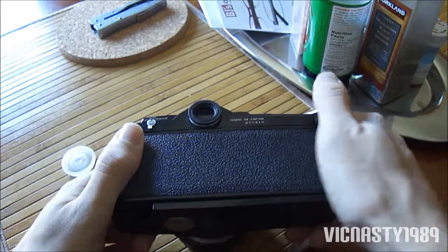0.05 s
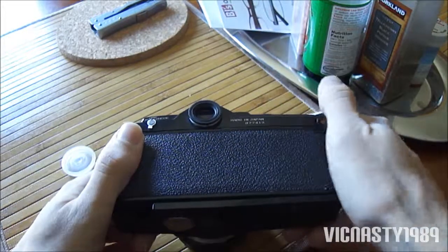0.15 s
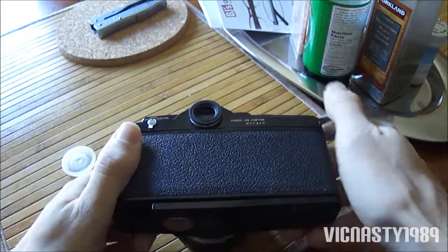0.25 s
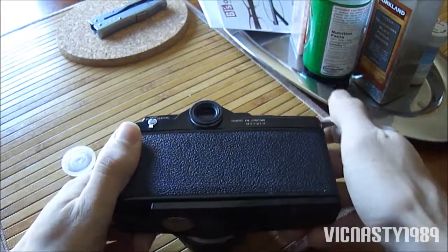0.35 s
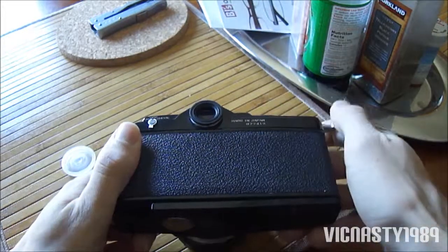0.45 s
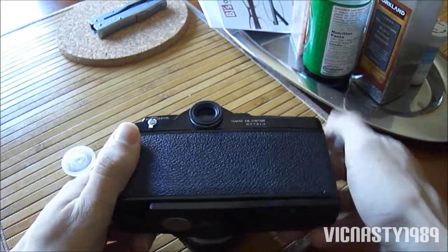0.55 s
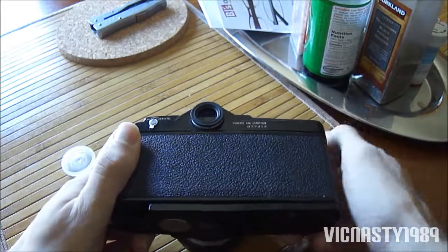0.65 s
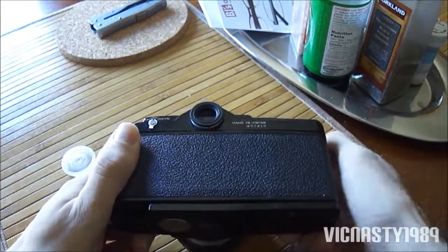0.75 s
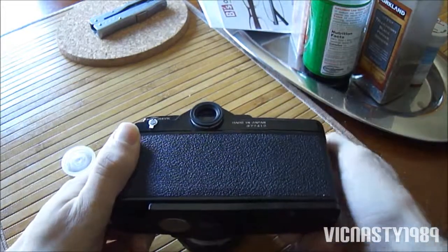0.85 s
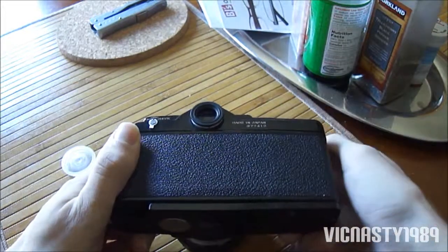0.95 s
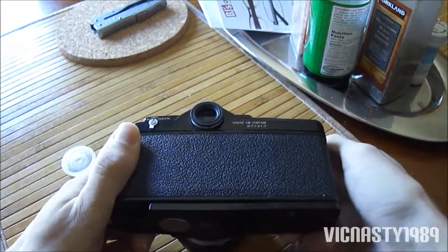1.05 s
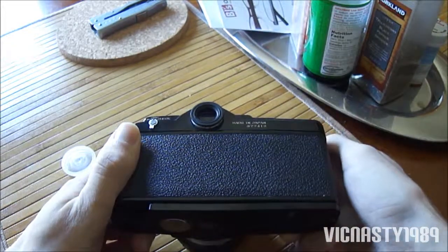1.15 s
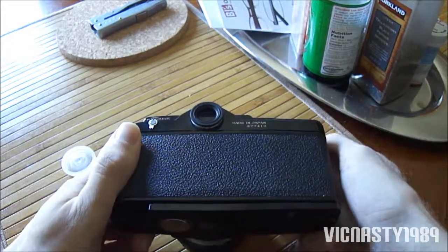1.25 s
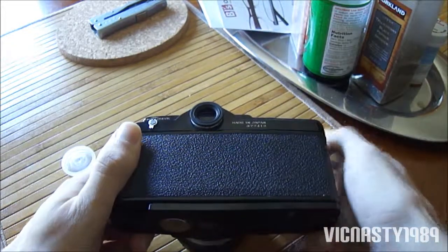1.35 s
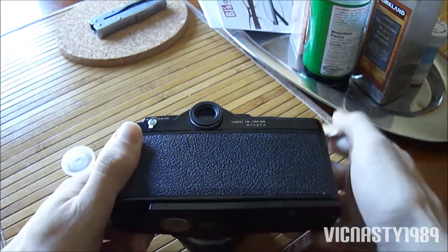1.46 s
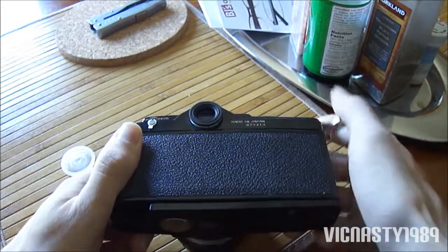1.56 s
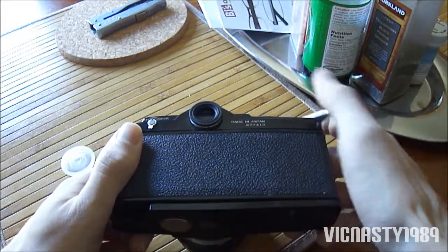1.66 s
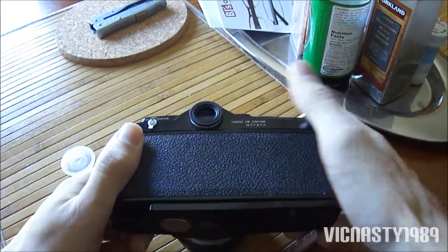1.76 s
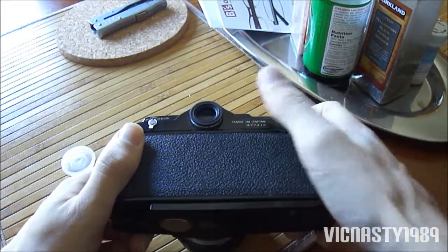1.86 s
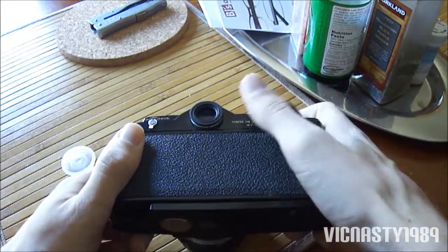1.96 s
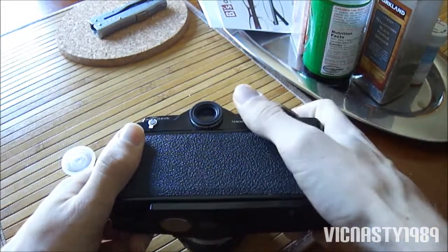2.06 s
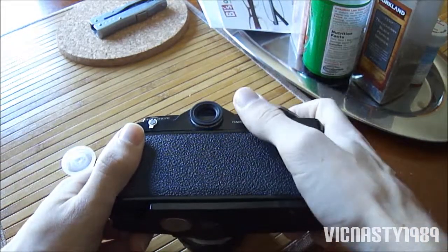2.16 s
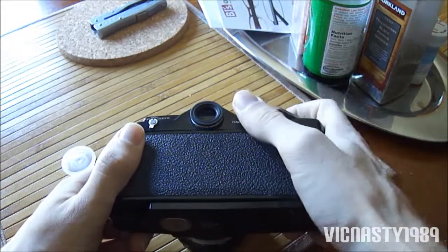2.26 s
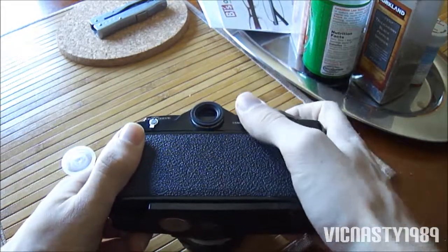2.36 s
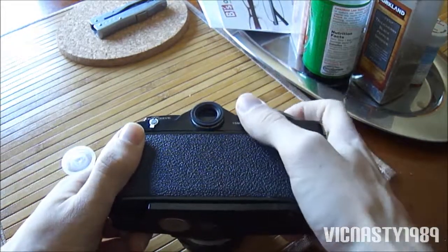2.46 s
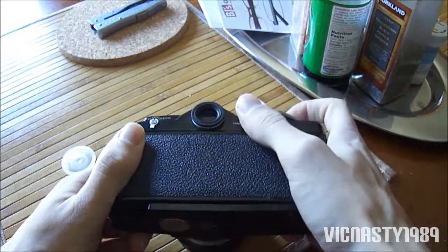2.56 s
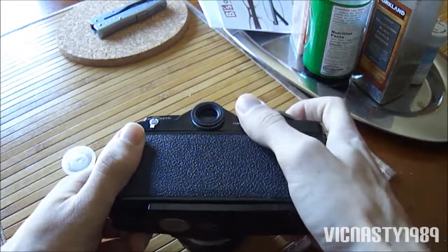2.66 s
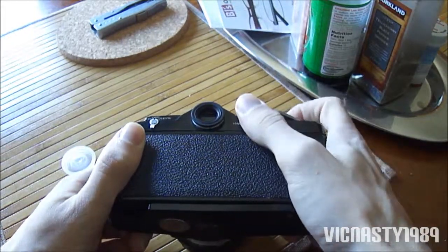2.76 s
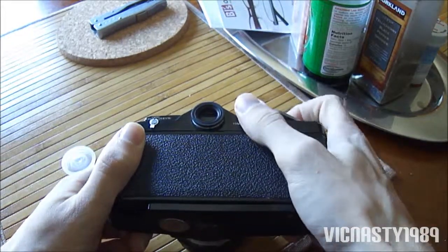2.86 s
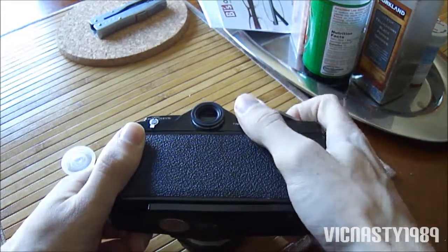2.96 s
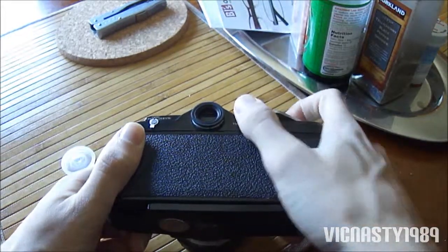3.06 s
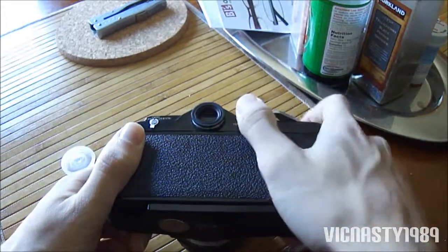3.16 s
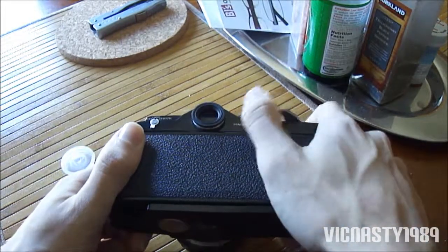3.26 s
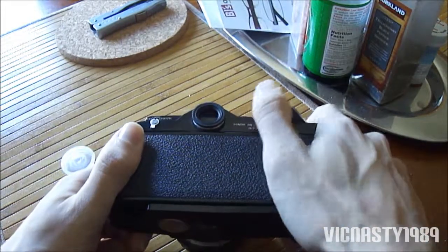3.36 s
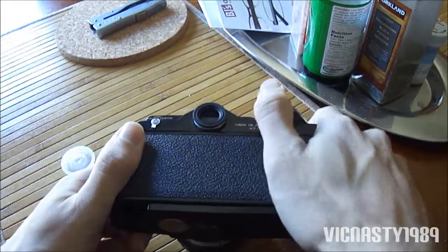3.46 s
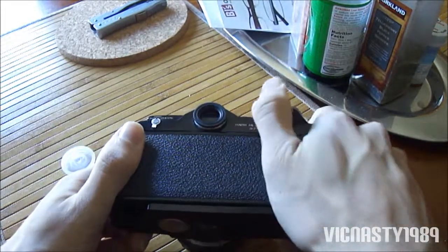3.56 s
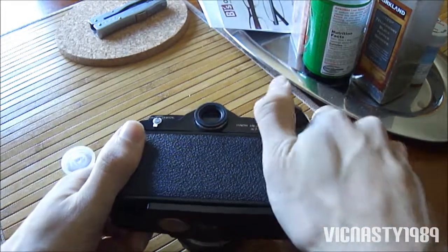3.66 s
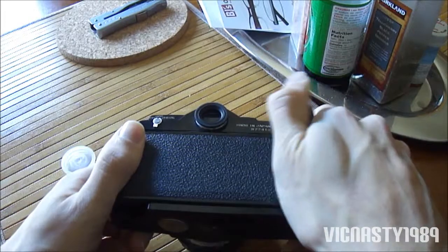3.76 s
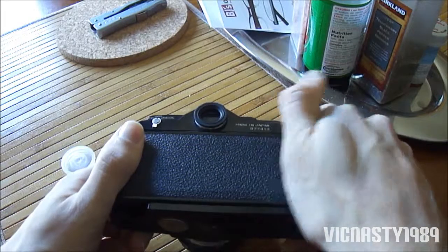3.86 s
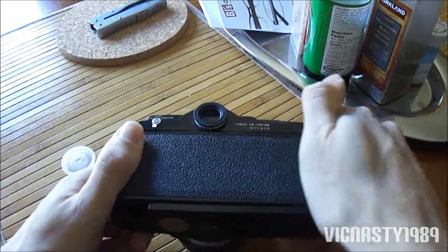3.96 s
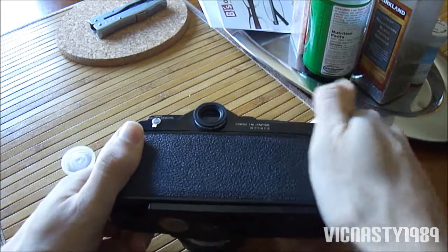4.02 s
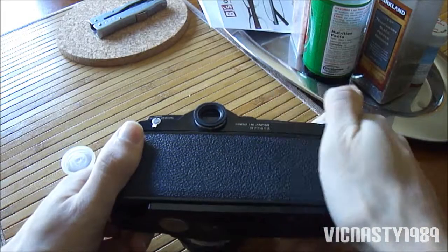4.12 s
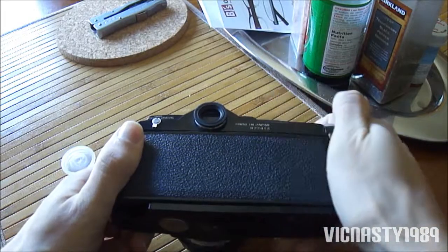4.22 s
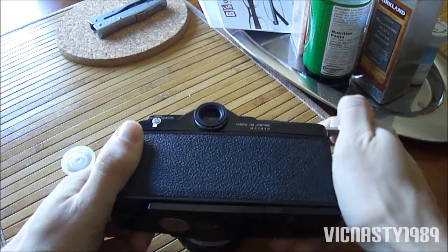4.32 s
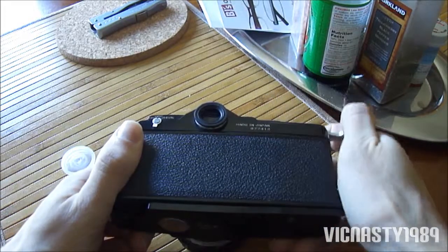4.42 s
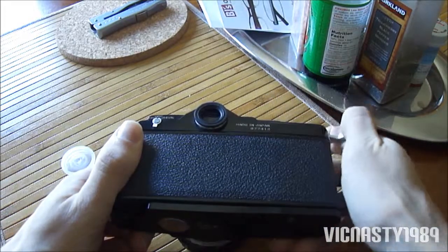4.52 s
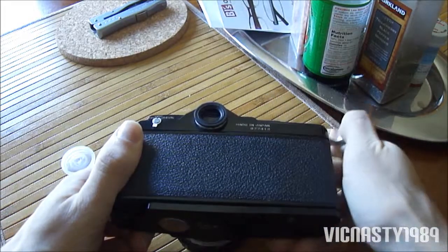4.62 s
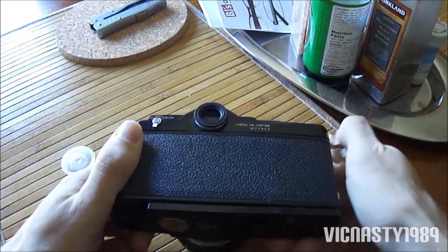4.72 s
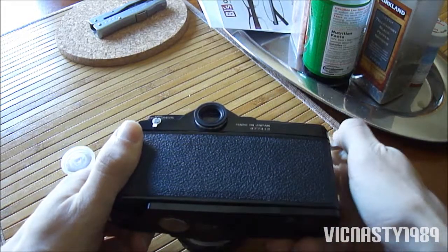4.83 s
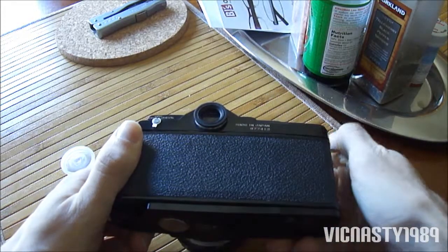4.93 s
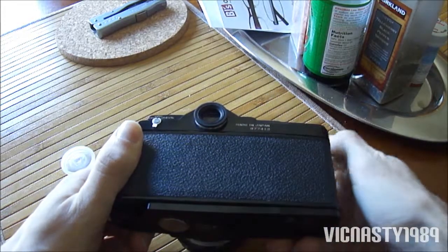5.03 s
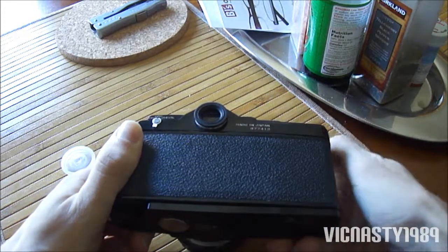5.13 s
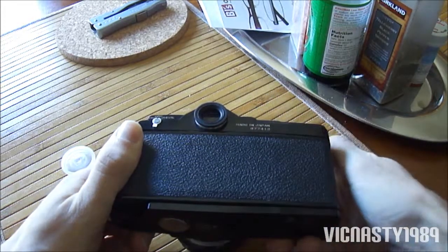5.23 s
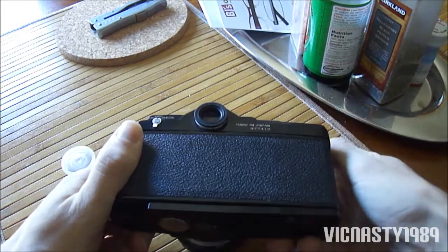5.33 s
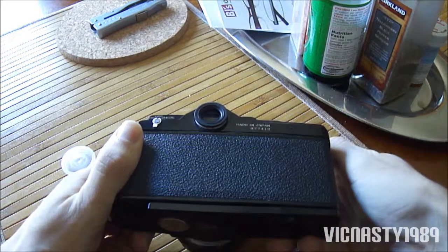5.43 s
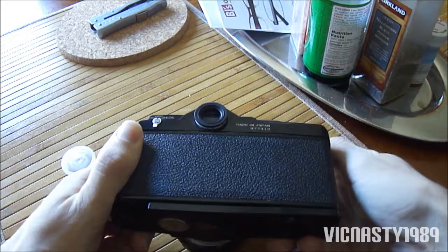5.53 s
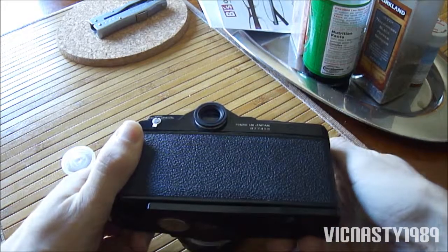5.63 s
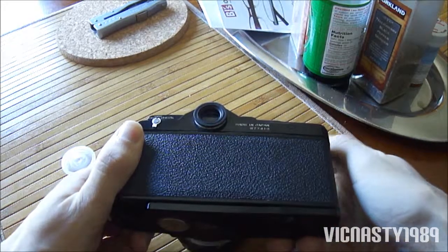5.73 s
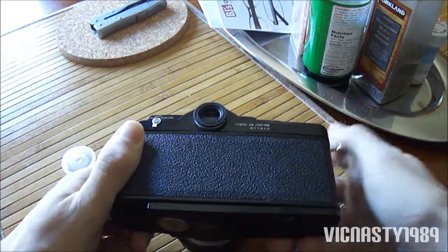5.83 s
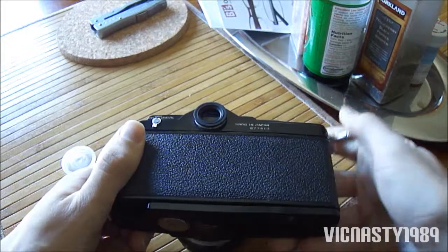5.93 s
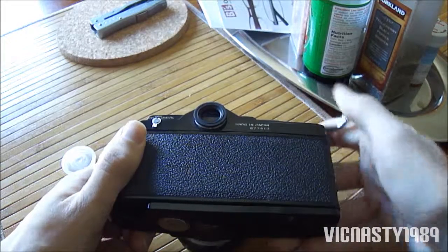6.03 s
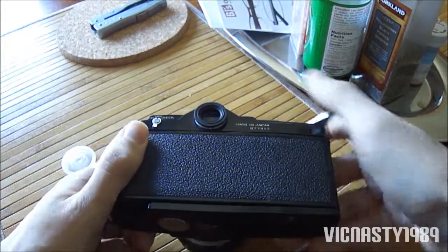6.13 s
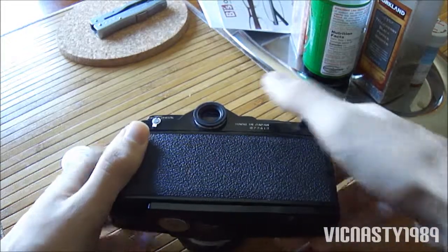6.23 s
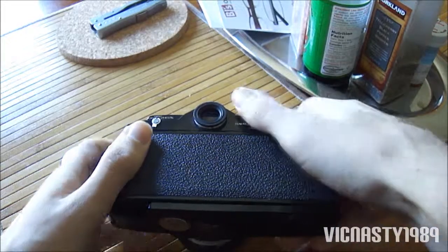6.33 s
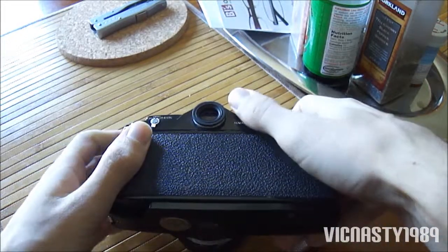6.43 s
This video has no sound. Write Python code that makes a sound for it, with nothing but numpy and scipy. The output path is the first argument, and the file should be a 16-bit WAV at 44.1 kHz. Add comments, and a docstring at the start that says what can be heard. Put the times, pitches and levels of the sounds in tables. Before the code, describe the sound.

Close, crisp metal clicks as a camera lever winds and ratchets back, a loud shutter clack with a short buzz, then slower winding and another ratchet return.

```python
"""In a quiet room with a motor hum, a mechanical film camera is worked by hand over a table, close by.
The lever is wound with pawl and gear clicks and eased back over its return ratchet. Then the shutter clacks
and its slow-speed escapement whirrs, and the lever is wound and eased back once more.
Clicks are bursts of noise that ring metal parts; sliding and rubbing are grainy noise; hum, squeaks and
springs are sine tones. Loud clicks make the recorder turn its level down for a moment."""
import sys
import numpy as np
from scipy import signal
from scipy.fft import rfft, irfft
from scipy.io import wavfile
from scipy.ndimage import uniform_filter1d, minimum_filter1d

SR = 44100
rng = np.random.default_rng(int(sys.argv[2]) if len(sys.argv) > 2 else 0)


def wav_out(sig):
    """Save sig, one row per channel (or a flat mono array), as 16-bit PCM at SR to the path in sys.argv[1]."""
    wavfile.write(sys.argv[1], SR, np.round(np.clip(np.atleast_2d(sig).T, -1, 1) * 32767).astype(np.int16))


N = 285978  # length in samples

# Room air: [f/Hz, relative level/dB per Hz]
AIR_COLOUR = [(25, -36), (60, -29), (110, -15), (200, -2), (350, -4), (500, -7.5), (800, -7.5),
              (1500, -12.5), (2500, -15.5), (5000, -21.5), (11000, -27.5)]
# Motor hum tones, before the hum trim: [f/Hz, level/dB]
HUM_TONES = [(102.3, -77.5), (150.7, -100), (199.2, -64), (247.6, -64), (296.1, -77.5), (371.4, -61.5)]
# How long reflections take to fall by 60 dB: [f/Hz, t60/s]
ROOM_DECAY = [(300, 0.28), (1500, 0.098), (5000, 0.8), (11000, 0.12)]
# Fingers shifting their grip on the leatherette: [start t/s, stop t/s, level/dB, sag/dB per s]
GRIPS = [(0, .15, -39.5, 124), (.42, .86, -47, 3), (1.1, 2.15, -51.5, -0.5), (2.5, 5.2, -52, 1),
         (5.92, 6.48, -56, -6)]
# Spectrum of rubbing fingers: [f/Hz, relative level/dB per Hz]
RUBBING_COLOUR = [(600, -4), (1300, 4), (2500, 2.5), (4500, -2.5), (7000, -5.5), (11000, -12.5)]
# Lever strokes, in which shafts and film slide: [start t/s, stop t/s, level/dB, sag/dB per s]
STROKES = [(.32, .82, -49, -4.5), (1.57, 2.08, -42, 37.5), (3.8, 5.2, -49, .5), (6.02, 6.4, -47.5, 6)]
# Spectrum of sliding shafts and film: [f/Hz, relative level/dB per Hz]
SLIDING_COLOUR = [(1000, -44), (3000, -18), (5500, -7), (9500, 0), (11000, -1)]
# Two faint squeaks of the film spool, each a path of points: [t/s, f/Hz, level/dB]
SQUEAK_PATHS = [
    [(4.6, 10500, -58), (4.625, 9600, -47), (4.65, 9200, -57)],
    [(4.87, 9550, -60), (4.9, 9800, -45), (4.925, 10200, -56), (4.935, 9700, -38), (4.955, 9800, -55)],
]
# Soft fingertip taps on the back door: [t/s, level/dB]
FINGER_TAPS = [(0.2562, -35.5), (5.8245, -39)]
# Light ticks and rebounds of loose parts: [t/s, level/dB]
LOOSE_TICKS = [(0.1961, -34), (0.3035, -34), (0.3104, -32.5), (0.8058, -32.5), (1.3685, -42), (1.4347, -42),
               (1.5904, -31.5), (1.6982, -29), (2.2078, -38), (2.2369, -35.5), (2.7841, -34.5),
               (3.1337, -35), (5.7823, -45.5), (5.9808, -37), (6.128, -25.5)]
# Dull knocks of the lever and fingers on the body: [t/s, level/dB, brightness/dB per octave]
KNOCKS = [(0.4951, -35, 13), (0.5767, -32, 0.0), (0.6517, -28.5, 2.0), (0.8362, -25, 2.5),
          (1.2415, -33, 1.5), (2.0808, -35.5, -2), (2.5795, -38.5, 0.5), (2.7429, -28.5, 4.0),
          (3.3257, -34.5, 3.5), (3.3521, -36.0, 0), (3.8358, -31, -12), (5.1873, -29, 1),
          (5.9161, -39.0, 3.5), (6.3895, -32, 1.5)]
# The lever strikes the end of its stroke: [t/s, level/dB, brightness/dB per octave]
STOP_BLOW = [(.6155, -16, -1)]
# The body's hollow ring at the end of the stroke: [f/Hz, level/dB, t60/s]
END_STOP_TONES = [(790, -28, 0.079), (2050, -32, 0.067), (2420, -42, .07)]
# Gear teeth snatching under load, in short runs: [first tooth t/s, last tooth t/s, number of teeth,
# level of all but the last/dB, level of the last/dB, brightness of the last/dB per octave]
GEAR_RUNS = [(3.798, 3.817, 3, -29, -20.5, -0.5), (3.913, 3.9322, 4, -33, -16, 0),
             (4.056, 4.07, 3, -27.5, -19, 0), (4.222, 4.2467, 2, -32, -21, 1.5),
             (4.3897, 4.433, 4, -33.5, -24, 0), (4.6775, 4.7176, 3, -32, -30, -4),
             (5.0008, 5.023, 3, -28, -23, 0.5)]
# The lever's return ratchet: [t/s, level/dB, brightness/dB per octave]
RETURN_CLICKS = [(1.5675, -20, -0.5), (1.6322, -20.0, -0.5), (1.6897, -17.5, -2.0), (1.7593, -21, 0.5),
                 (1.8531, -19, -2.0), (1.9537, -20.5, -2.5), (5.999, -18.5, 1.0), (6.0621, -20, 0),
                 (6.1173, -18.5, 1.0), (6.1885, -17.5, -1), (6.2471, -18.5, -1), (6.3214, -18, -0.5)]
# The winding pawl and the lever's latch dropping: [t/s, level/dB, brightness/dB per octave]
PAWL_CLICKS = [(0.3132, -19.5, 7), (0.3213, -29, -2.5), (0.3343, -17.5, 3.5), (0.3759, -20.5, 5.5),
               (0.4369, -21, 6.0), (0.4552, -28.5, -3.5), (0.4688, -19, -4), (0.4752, -29, 4),
               (0.5184, -20, 0.5), (0.5448, -25, 6), (0.6087, -21, 2), (0.6334, -16, -4.5),
               (0.6844, -29, -3.5), (0.7002, -21.0, -1.5), (0.747, -27.5, -1), (0.784, -27, -4.5),
               (0.7939, -27.5, -4.5), (0.889, -29.0, 5), (1.4877, -29.5, -1), (2.0048, -25, -5),
               (2.0591, -26.5, -5), (2.0626, -20.5, -5), (3.7736, -23, 3.5), (3.8044, -18, 3.5),
               (3.8295, -21.5, 8), (3.9039, -22.5, 2), (3.9493, -19.0, 1.5), (3.9746, -27.5, -1.0),
               (4.0381, -25.5, 0.5), (4.0811, -27, -2), (4.0925, -20, 0.5), (4.1333, -25, -0.5),
               (4.2104, -25, 1), (4.2782, -23.5, 3.5), (4.3147, -20.5, 2), (4.3538, -24, 2),
               (4.419, -24, 6), (4.4325, -23, 3), (4.4678, -25.5, -1.5), (4.5113, -22.5, -1.5),
               (4.5367, -30.5, 0), (4.6529, -28.5, 1.5), (4.7295, -27.5, 0), (4.7985, -20.5, -1),
               (4.8111, -28.5, -2), (4.9669, -28, 1.5), (5.0423, -17.5, -1), (5.0936, -29.0, -0.5),
               (5.1696, -26.5, -4), (5.2196, -16, -1.5), (6.3504, -21.5, -6), (6.3751, -19.5, -5)]
# The escapement runs down: [start t/s, stop t/s, level/dB, sag/dB per s]
ESCAPEMENT_RUN = [(2.936, 3.088, -27, 90)]
# Springs left singing by the shutter: [f/Hz, level/dB, t60/s]
SPRING_TONES = [(560, -53, 3.6), (1196, -51, 2), (2090, -37, 0.8), (4700, -37, .5)]
# Mirror and curtains jolt the whole body: [t/s, level/dB]
JOLTS = [(2.843, -33), (2.903, -34), (3.089, -39)]
# The button trips the shutter: [t/s, level/dB]
TRIP = [(2.8259, -33.5)]
# Mirror and curtains: [t/s, level/dB, brightness/dB per octave]
SHUTTER_BLOWS = [(2.838, -20, -3.5), (2.8412, -13.5, 4.5), (2.8489, -16.5, -3), (2.8649, -13, 3),
                 (2.8707, -15.5, 1), (2.8803, -14, -1.5), (2.8896, -15, -1.5), (2.8995, -15.5, -1.0),
                 (2.903, -11, 6.5), (2.9332, -24.5, 1.5), (3.0653, -32.5, 1), (3.0903, -21.5, 0.5)]

# Tones each part rings with when struck: [f/Hz, width/Hz, relative level/dB]
DOOR_MODES = [(1180, 390, 2), (1850, 500, -22), (5500, 2000, 7)]
KNOCK_MODES = [(830, 590, -10.5), (1565, 280, 1), (2140, 93, 4), (2520, 380, -1.5), (4770, 1100, -8.5),
               (5900, 580, -11), (6740, 170, -13), (7900, 260, -4), (8722, 190, -19), (9100, 370, -12),
               (10100, 180, -15)]
GEAR_MODES = [(1040, 210, -10), (1570, 270, -12.5), (2540, 550, -4.5), (4200, 120, -4), (4320, 270, 11.5),
              (6760, 740, -5), (8700, 400, 0), (10000, 480, -15)]
RETURN_MODES = [(1460, 330, -19.5), (2380, 78, -9.5), (2985, 190, -6), (3297, 73, -5.5), (5330, 340, -4),
                (6140, 240, -1.5), (6900, 530, -6), (7200, 459, -26), (9100, 540, -5.5), (9760, 280, -8),
                (9500, 166, -29), (10600, 210, 0.5)]
PAWL_MODES = [(1210, 580, -15.5), (2238, 370, -7.5), (3060, 680, -19), (4370, 260, -9.5), (5117, 410, -9.5),
              (5756, 520, -11.5), (6660, 81, -4.5), (7310, 400, -14), (8750, 1030, -0.5), (9840, 880, 3),
              (9640, 380, -3.5), (10570, 440, -7)]
ESCAPEMENT_MODES = [(515, 53, -4), (930, 320, -0.5), (1540, 220, -1.5), (2050, 550, 0.5), (2750, 250, -5),
                    (4610, 1400, 1), (5340, 450, -1), (7100, 1400, -9), (8800, 1000, -2), (9500, 400, -11)]
SHUTTER_MODES = [(830, 290, -10.5), (1360, 55, 1), (2260, 490, 1), (3300, 200, 2.5), (4650, 670, 0.5),
                 (5180, 370, 1.5), (6440, 700, -2.5), (7350, 340, -2.5), (8640, 537, -1), (9300, 700, -4),
                 (9700, 510, -4.5), (10600, 650, -7)]

# Borders between shell, frame and small steel parts: [f/Hz]
REGISTER_HZ = [2500, 7500]
# Brightness tilts the spectrum only between these two: [f/Hz]
TILT_RANGE_HZ = [1200, 11000]

# How a blow divides, compared with the frame and before brightness: (shell/dB, small steel parts/dB)
PAWL_SHARE, GEAR_SHARE, RETURN_SHARE = (-14, 3.1), (-9.5, -9.5), (-19.5, -1.9)
KNOCK_SHARE, PLAY_SHARE, SHUTTER_SHARE = (-1.1, -6.5), (-10.5, -5), (-7.5, -2.3)
DOOR_SHARE, RATTLE_SHARE = (6, -10), (-0.72, -9)

CROSSOVER_HZ = 120  # softness of the borders
EDGE_HZ = 11160  # the recorder's upper limit
CLICK_S = .005  # click levels count the energy as if spread over this time


def gain_of(db):
    """Turns decibels into amplitude."""
    return 10 ** (np.asarray(db) / 20)


def evened(x):
    """Scales a sound to an average (rms) strength of 1."""
    return x / np.sqrt(np.mean(x ** 2) + 1e-20)


def read(points, hz):
    """Reads a table of points between its rows, on a log-frequency axis."""
    f, value = np.transpose(points)
    return np.interp(np.log(hz + 1), np.log(f + 1), value)


def add(mix, s, sound):
    """Mixes a sound in at time s."""
    part = mix[max(round(s * SR), 0):][:len(sound)]
    part += sound[:len(part)]


def wobble(size):
    """Smooth chance of rms 1 that changes over size samples."""
    return evened(uniform_filter1d(rng.standard_normal(N), size))


def noise(colour):
    """Steady noise of a given spectrum, rms 1."""
    white = rfft(rng.standard_normal(N))
    shape = gain_of(read(colour, np.fft.rfftfreq(N, 1 / SR)))
    return evened(irfft(white * shape, N))


def gestures(rows, attack_s, release_s):
    """Strength of movements that swell, sag steadily and die away (20 dB per attack or release time)."""
    t = np.arange(N) / SR
    strength = np.zeros(N)
    for start, stop, db, sag in rows:
        sagging_db = db - sag * (np.clip(t, start, stop) - start)
        swell_db = 20 * np.maximum(start - t, 0) / attack_s
        fade_db = 20 * np.maximum(t - stop, 0) / release_s
        strength += gain_of(sagging_db - swell_db - fade_db)
    return strength


def friction(motion, colour, grain_db):
    """Surfaces catch and slip in grains a few milliseconds long."""
    return motion * evened(noise(colour) * gain_of(grain_db * wobble(size=160)))


def ringing(start_s, modes):
    """After one blow, tones die away freely; each is cut after one second."""
    t, out = np.arange(SR) / SR, np.zeros(N)
    for hz, db, t60 in modes:
        add(out, start_s, gain_of(db - 60 * t / t60) * np.sin(2 * np.pi * hz * t))
    return out


def response(modes, size):
    """How a part with these resonances answers each frequency, never before it is struck."""
    hz = abs(np.fft.fftfreq(size, 1 / SR)) + 1
    power = sum(gain_of(db) ** 2 / (1 + ((hz ** 2 - f ** 2) / (hz * width)) ** 2) for f, width, db in modes)
    return np.exp(np.conj(signal.hilbert(np.log(power) / 2)))[:size // 2 + 1]


def clicks(rows, modes, share, chatter_s, ring_db, ring_s, swell_s, vary_db=2.0, detune=0.0155, size=4096):
    """Metal contacts chatter briefly, ring the part and die away in the case.
    Rows: (t/s, level/dB) and perhaps a brightness in dB per octave."""
    t, hz = np.arange(size) / SR, np.fft.rfftfreq(size, 1 / SR)
    borders = REGISTER_HZ + [EDGE_HZ + 2 * CROSSOVER_HZ]
    below = [1 / (1 + np.exp(np.clip((hz - f) / CROSSOVER_HZ, -20, 20))) for f in borders]
    registers = np.diff(below, axis=0, prepend=0)  # three softly overlapping ranges
    octaves = np.log2(np.clip(hz, *TILT_RANGE_HZ) / TILT_RANGE_HZ[0])
    since, out = t - CLICK_S, np.zeros(N)
    swell = np.exp(np.minimum(since, 0) / swell_s)  # each click swells for about a millisecond before its peak
    after = np.maximum(since, 0)
    contact = swell * (np.exp(-after / chatter_s) + gain_of(ring_db) * np.exp(-after / ring_s))
    for s, level_db, *brightness in rows:
        # each blow meets the part at another spot and under another load
        chance = rng.standard_normal((len(modes), 2))
        struck = [(f * (1 + detune * a), width, db + vary_db * b)
                  for (f, width, db), (a, b) in zip(modes, chance)]
        bands = rfft(contact * rng.standard_normal(size)) * response(struck, size) * registers
        # the blow divides among shell, frame and small parts; a harder contact tilts it upward
        blow = gain_of([share[0], 0, share[1]]) / np.linalg.norm(bands, axis=1) @ bands
        click = irfft(blow * gain_of(sum(brightness) * octaves), size)
        add(out, s - CLICK_S, gain_of(level_db) * np.sqrt(CLICK_S * SR) * click / np.linalg.norm(click))
    return out


def background(air_db=-50.5, hum_trim_db=-0.5, drift_hz=2.4):
    """Room air is soft noise; a distant motor hums in tones of wavering pitch."""
    out = gain_of(air_db) * noise(AIR_COLOUR)
    for hz, db in HUM_TONES:
        turns = np.cumsum(hz + drift_hz * wobble(size=4000)) / SR
        out += np.sqrt(2) * gain_of(db + hum_trim_db) * np.sin(2 * np.pi * turns)
    return out


def room(x, gap_s=0.0031):
    """Table and walls send back sparse reflections, each band dying at its own speed."""
    taps = rng.standard_normal(SR // 2) * (rng.random(SR // 2) < .1)
    hz, t, z = signal.stft(taps, SR, nperseg=256)
    fading = gain_of(-60 * t / read(ROOM_DECAY, hz)[:, None])
    tail = signal.istft(z * fading, SR, nperseg=256)[1]
    tail = tail * (np.arange(len(tail)) > gap_s * SR)
    return signal.fftconvolve(x, tail / np.linalg.norm(tail))[:N]


def hands():
    """Fingers rub on the leatherette as they shift their grip."""
    return friction(gestures(GRIPS, attack_s=0.38, release_s=0.23), RUBBING_COLOUR, grain_db=3.0)


def squeaks(waver=.008, flutter_db=4):
    """The film spool sticks and slips, giving thin, broken tones."""
    out = np.zeros(N)
    for rows in SQUEAK_PATHS:
        s, hz, db = np.transpose(rows)
        t = np.arange(s[0], s[-1], 1 / SR)
        pitch = np.interp(t, s, hz) * (1 + waver * wobble(size=60)[:len(t)])
        tone = np.sin(2 * np.pi * np.cumsum(pitch) / SR) * signal.windows.hann(len(t)) ** .5
        level_db = np.interp(t, s, db) + flutter_db * wobble(size=200)[:len(t)]
        add(out, s[0], gain_of(level_db) * tone)
    return out


def rattle(motion, per_s=45, below_sliding_db=-3, spread_db=2, count=500, quietest_db=-62):
    """The moving gear train makes tiny random clicks whose level follows the lever's motion."""
    place, size, chance = rng.random((count, 3)).T
    at = (place * N).astype(int)
    levels_db = 20 * np.log10(motion[at] + 1e-9) + below_sliding_db - spread_db * np.log(1 - size)
    # per_s is the average rate before the quietest are left out
    heard = (chance < per_s * N / SR / count) & (levels_db > quietest_db)
    rows = list(zip(at[heard] / SR, levels_db[heard]))
    return clicks(rows, KNOCK_MODES, RATTLE_SHARE,
                  chatter_s=.001, ring_db=-11, ring_s=0.0048, swell_s=0.00084)


def door_taps():
    """Fingertips tap softly on the back door, which rings dully."""
    return clicks(FINGER_TAPS, DOOR_MODES, DOOR_SHARE,
                  chatter_s=0.002, ring_db=-2, ring_s=0.013, swell_s=0.0012)


def loose_parts():
    """Loose parts tick and rebound, ringing with the pawl's tones."""
    return clicks(LOOSE_TICKS, PAWL_MODES, PLAY_SHARE,
                  chatter_s=0.00076, ring_db=-5, ring_s=0.0082, swell_s=0.0007)


def knocks():
    """Lever and fingers knock on the body with a longer, duller contact."""
    return clicks(KNOCKS, KNOCK_MODES, KNOCK_SHARE,
                  chatter_s=0.0027, ring_db=-14, ring_s=0.011, swell_s=0.00062)


def end_stop():
    """The lever strikes the end of its stroke and the body rings hollow."""
    blow = clicks(STOP_BLOW, KNOCK_MODES, KNOCK_SHARE,
                  chatter_s=0.00057, ring_db=-13.5, ring_s=0.009, swell_s=0.00028)
    return blow + ringing(.6334, END_STOP_TONES)


def gear_teeth(slip_db_per_octave=-2.5):
    """Evenly spaced teeth slip softly and more dully until the last one snaps home."""
    rows = []
    for first, last, teeth, first_db, last_db, brightness in GEAR_RUNS:
        slips = np.linspace(first, last, round(teeth))[:-1]
        rows += [(s, first_db, brightness + slip_db_per_octave) for s in slips]
        rows.append((last, last_db, brightness))
    return clicks(rows, GEAR_MODES, GEAR_SHARE,
                  chatter_s=0.001, ring_db=-9.5, ring_s=0.0053, swell_s=0.00038, detune=.03)


def return_ratchet():
    """The lever clicks over its ratchet on the way back, each click much like the others."""
    return clicks(RETURN_CLICKS, RETURN_MODES, RETURN_SHARE, chatter_s=0.00064, ring_db=-6.5,
                  ring_s=0.0034, swell_s=0.00024, vary_db=0.5, detune=.02)


def pawl():
    """The winding pawl and the lever's latch drop with bright clicks."""
    return clicks(PAWL_CLICKS, PAWL_MODES, PAWL_SHARE,
                  chatter_s=0.00095, ring_db=-8, ring_s=0.0058, swell_s=0.0005)


def escapement(ticks_per_s=720, jitter=0.21, loose=0.19, grain_db=1.8):
    """A pallet flutters on a fast star wheel while the loose gear train rattles."""
    speed = ticks_per_s * (1 + jitter * wobble(size=60))
    ticks = np.diff(np.floor(np.cumsum(speed) / SR), prepend=0)  # a pulse at each whole number passed
    drive = (ticks + loose * rng.standard_normal(N)) * gain_of(grain_db * wobble(size=70))
    whirr = irfft(rfft(drive) * response(ESCAPEMENT_MODES, N), N)
    return evened(whirr) * gestures(ESCAPEMENT_RUN, attack_s=.025, release_s=0.095)


def springs():
    """Springs shaken by the shutter sing on faintly."""
    return ringing(2.866, SPRING_TONES)


def jolts(hz=70, t60_s=0.023):
    """A low, dead thud lies under the shutter's jolts to the body."""
    return sum(ringing(s, [(hz, db, t60_s)]) for s, db in JOLTS)


def shutter():
    """The button trips the shutter, then mirror and curtains strike hard."""
    return clicks(TRIP + SHUTTER_BLOWS, SHUTTER_MODES, SHUTTER_SHARE,
                  chatter_s=0.0011, ring_db=-8.5, ring_s=0.0069, swell_s=0.00086)


def scene():
    """All parts of the camera, their reflections, the hands, and the room's own sound."""
    air = background()
    rubbing = hands()
    lever = gestures(STROKES, attack_s=0.13, release_s=.22)
    camera = friction(lever, SLIDING_COLOUR, grain_db=1)
    camera += squeaks() + rattle(lever)
    camera += door_taps() + loose_parts() + knocks() + end_stop()
    camera += gear_teeth() + return_ratchet() + pawl()
    camera += escapement() + springs() + jolts() + shutter()
    reflections = gain_of(-26) * room(camera)
    return (camera + reflections + rubbing + air)[None]


def held(x, hold_s):
    """The lowest value of the last hold_s seconds."""
    half = int(hold_s * SR / 2)
    return minimum_filter1d(x, 2 * half + 1, origin=half)


def gain_pops(sound, trip_db=-22, sense_hz=7000, rearm_s=0.013, hold_s=.044,
              up=0.016, down=0.016, width_s=0.00027, low_hz=20):
    """The gain stage pops softly: upward when a loud click trips it, downward when it lets go."""
    sensed = signal.sosfilt(signal.butter(6, sense_hz, fs=SR, output="sos"), sound)
    calm = 1. * (uniform_filter1d(sensed ** 2, size=44) < gain_of(trip_db) ** 2)
    trips = np.diff(held(calm, rearm_s), prepend=1) < 0
    releases = np.diff(held(calm, hold_s), prepend=1) > 0
    u = np.arange(SR // 100) / SR / width_s
    pops = signal.oaconvolve(up * trips - down * releases, u * np.exp(1 - u))[:N]
    return signal.sosfilt(signal.butter(1, low_hz, "high", fs=SR, output="sos"), pops)


def record(dry, threshold_db=-22, ratio=1.38, hold_s=0.0464, react_s=0.0015):
    """Gain control ducks briefly at each loud click; then the recorder's steep limit cuts the top."""
    level_db = 10 * np.log10(abs(uniform_filter1d(dry[0] ** 2, size=44)) + 1e-12)
    wanted_db = -np.maximum(level_db - threshold_db, 0) * (1 - 1 / ratio)
    held_db = held(wanted_db, hold_s)
    lag = np.exp(-1 / (react_s * SR))
    smooth_db = signal.lfilter([1 - lag], [1, -lag], held_db)
    ducked = dry * gain_of(smooth_db) + gain_pops(dry[0])
    lowpass = signal.firwin(601, EDGE_HZ, window=("kaiser", 6), fs=SR)
    return signal.oaconvolve(ducked, lowpass[None], "same")


dry = scene()
out = record(dry)
wav_out(out)
```